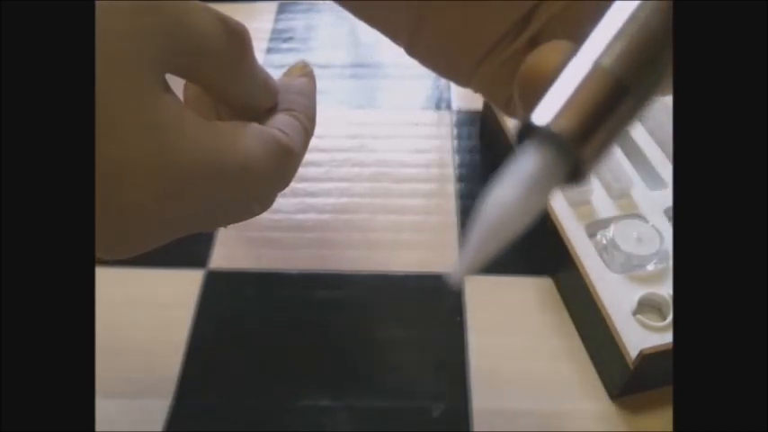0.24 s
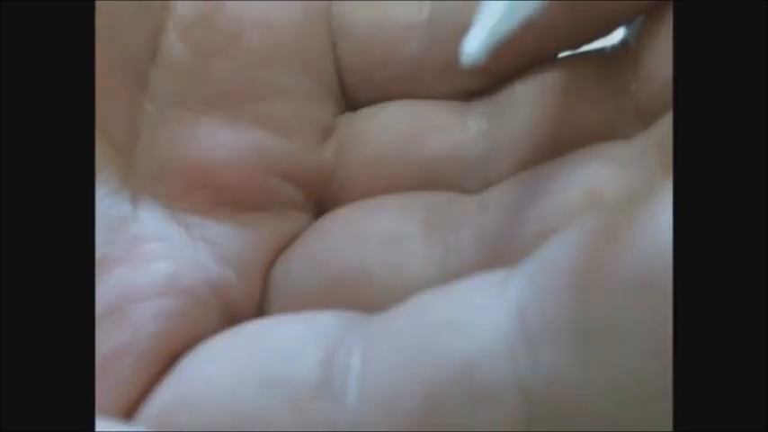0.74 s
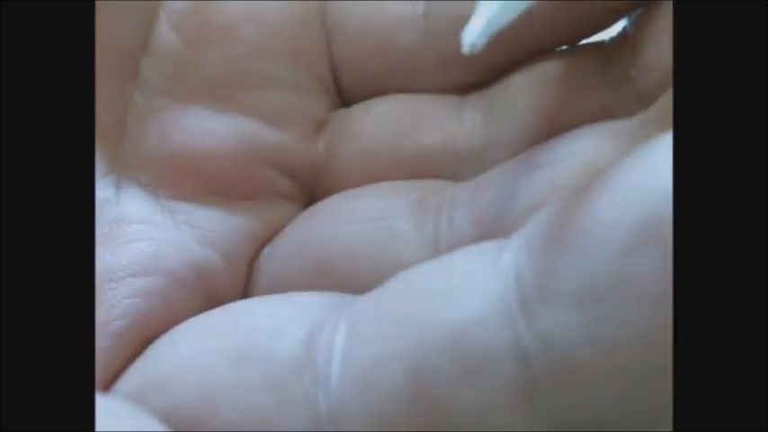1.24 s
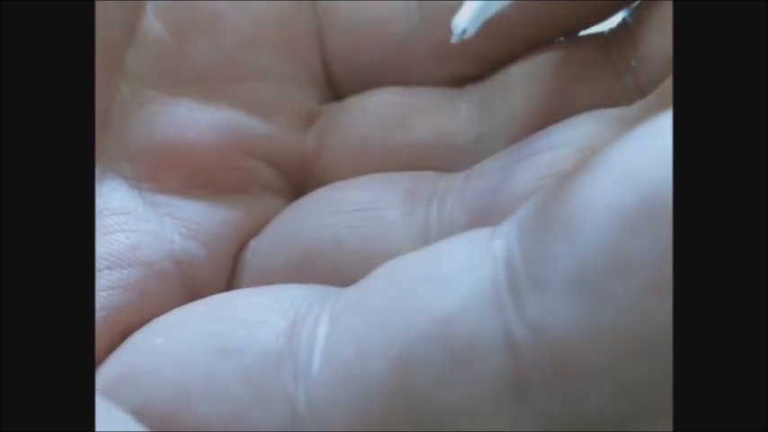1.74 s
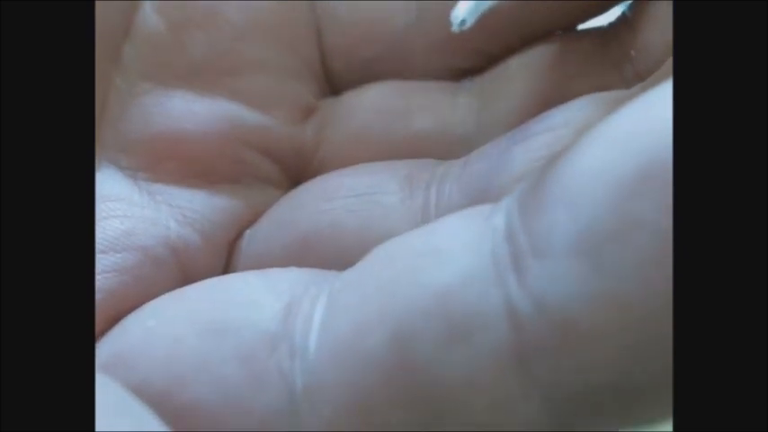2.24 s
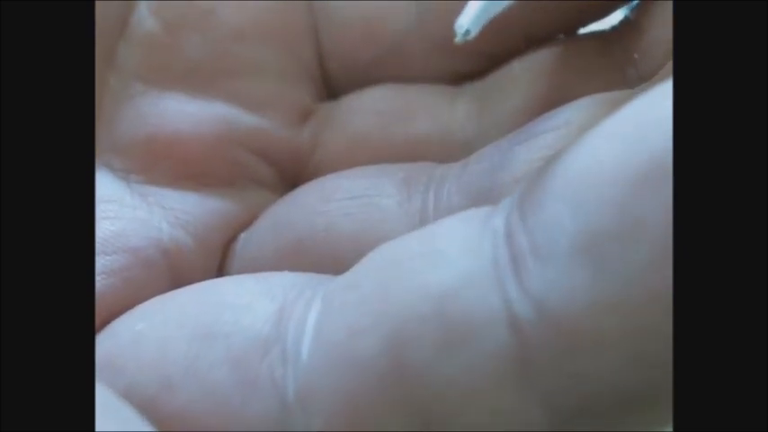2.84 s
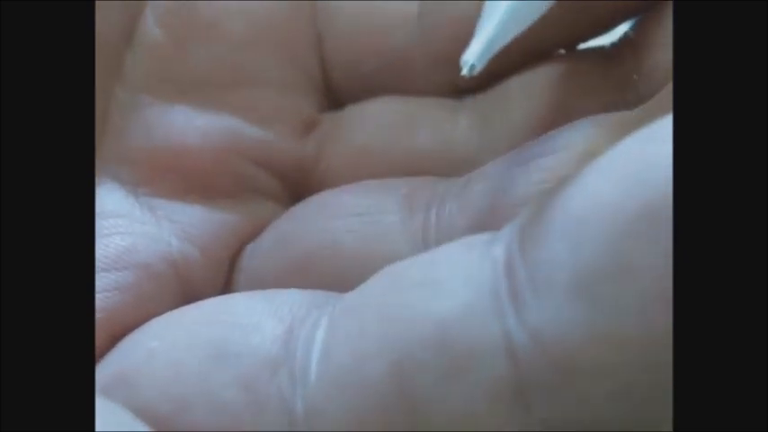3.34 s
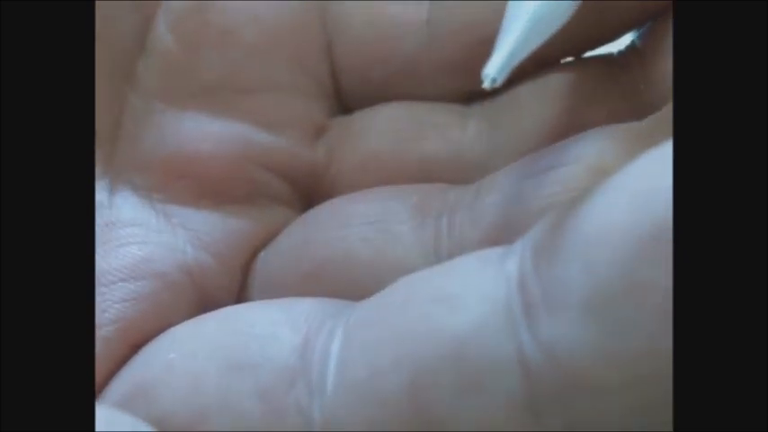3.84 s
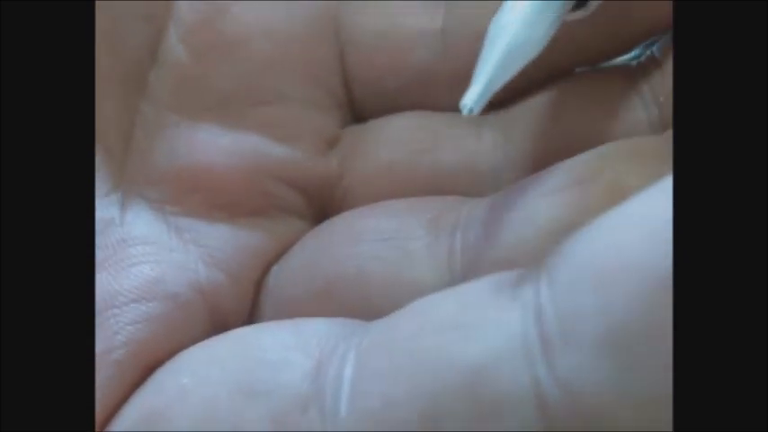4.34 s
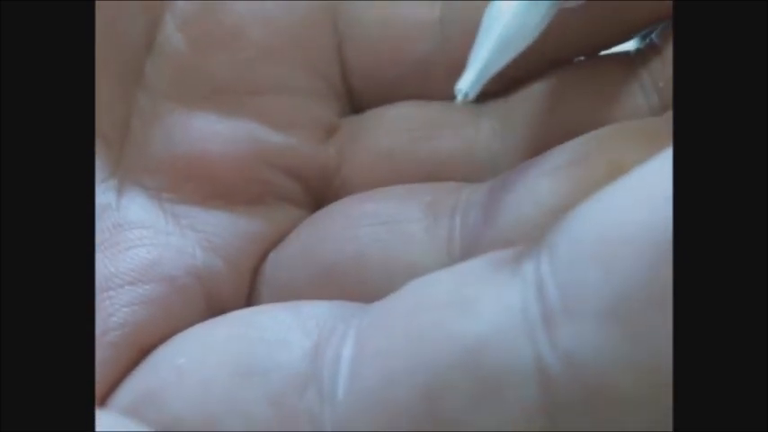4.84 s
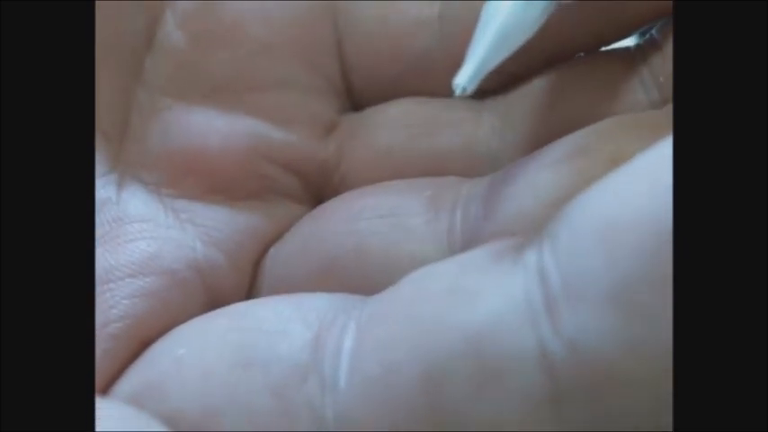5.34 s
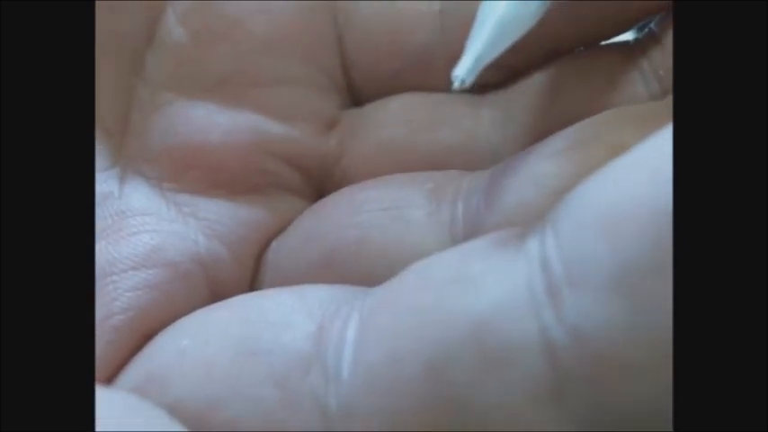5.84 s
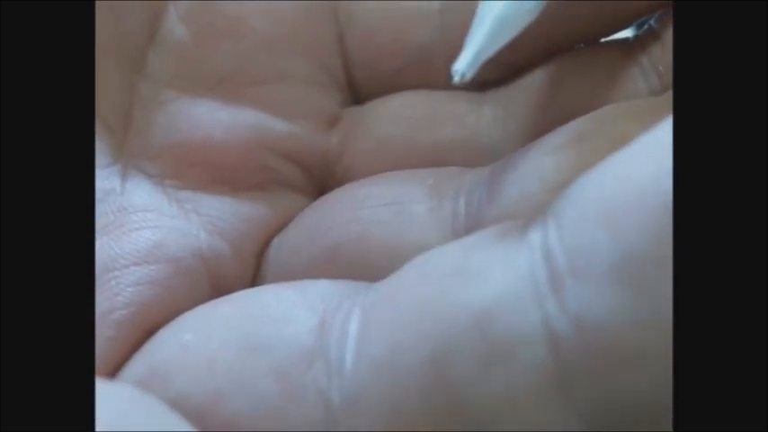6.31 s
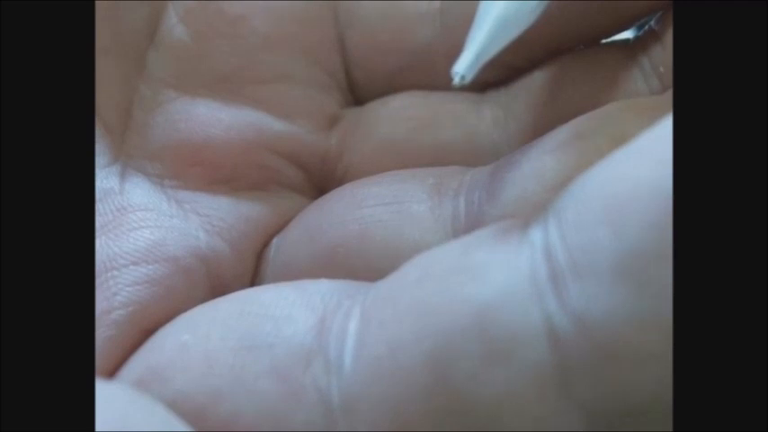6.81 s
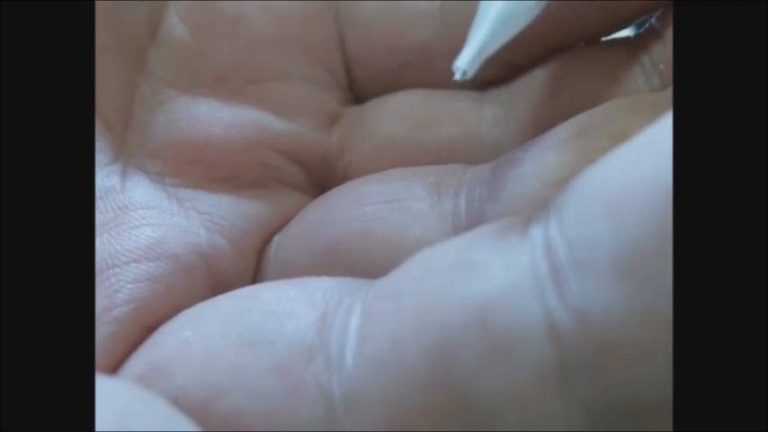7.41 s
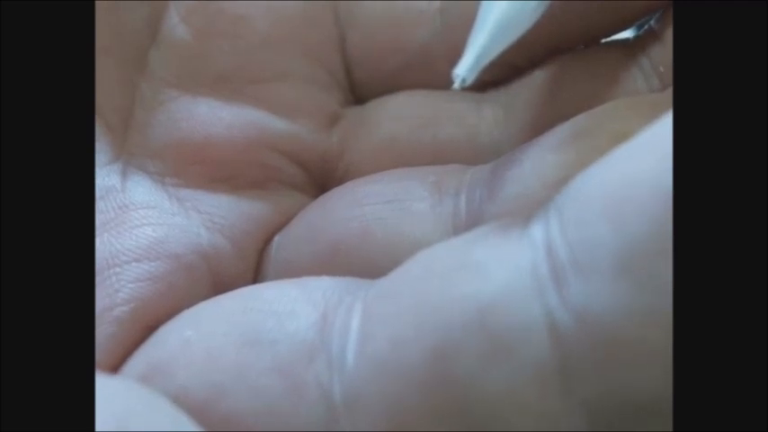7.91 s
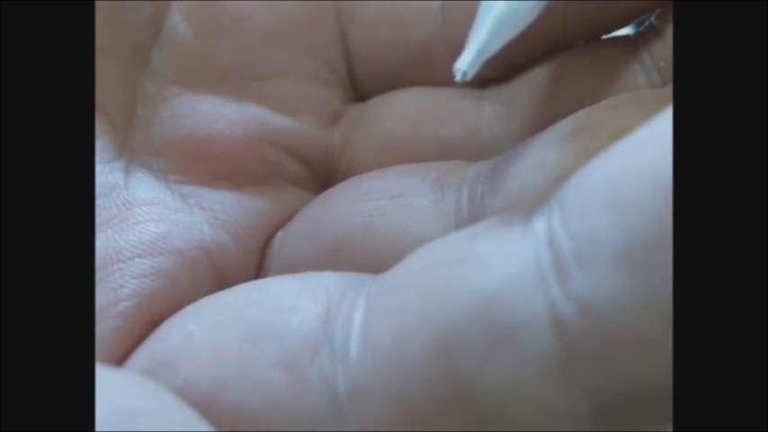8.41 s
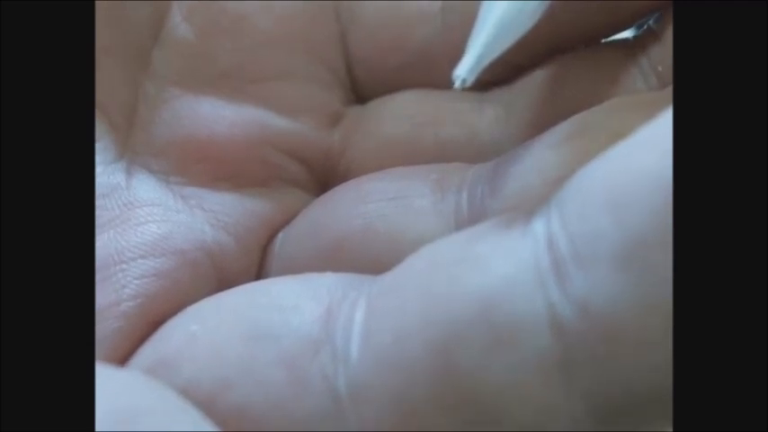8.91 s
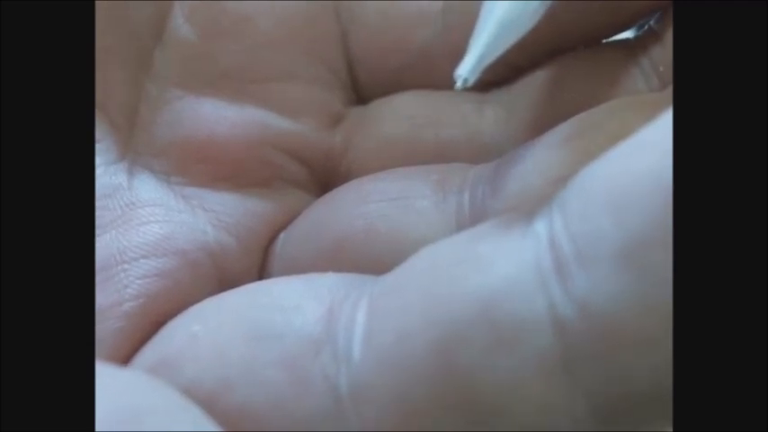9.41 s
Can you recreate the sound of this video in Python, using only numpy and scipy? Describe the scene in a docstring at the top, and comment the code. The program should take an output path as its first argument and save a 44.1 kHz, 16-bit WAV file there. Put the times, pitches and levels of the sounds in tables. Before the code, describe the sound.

A small rotary tattoo pen buzzes nearby in a quiet room, its motor humming and its needle rattling with a bright, ringing edge and little bass. It starts suddenly and runs in four stretches, the tone changing briefly in each of the first two. In the pauses, soft ticks and a faint, steady fan-like hum are heard, and a light switch click marks two of the restarts. The last stretch continues to the end.

```python
"""A quiet room with a steady fan-like tone; at 0.6 s the buzz of a nearby pen-style rotary tattoo machine
cuts in abruptly, already at full speed. Its motor hums, and once a turn a cam (an off-centre wheel)
knocks the needle bar, which rattles in its cartridge and rings the casing. Twice early on the fingers
loosen and the buzz changes colour. The machine pauses at about 1.5, 3.5 and 7.7 s, with switch clicks
at the first two restarts and two other short ticks in the pauses, then buzzes on to the end."""
import sys
import numpy as np
from scipy import signal
from scipy.fft import rfft, irfft, next_fast_len
from scipy.io import wavfile

SR = 44100
rng = np.random.default_rng(int(sys.argv[2]) if len(sys.argv) > 2 else 0)


def unload_wav(signal):
    """Save mono or channel-first audio to the path in sys.argv[1] as 16-bit WAV at rate SR, clipped to [-1, 1]."""
    wavfile.write(
        sys.argv[1],
        SR,
        np.round(np.clip(np.atleast_2d(signal).T, -1, 1) * 32767).astype(np.int16),
    )


N = 426006

# Each stretch of buzzing. Columns: on_s, off_s, spin_up_s (time constant), extra_speed_hz, grip (0-1),
# rattle_db, thin_ring_db, sizzle_db, scrape_db
MOTOR_RUNS = [(.58, 1.52, .0003, 1.36, 0.67, -39.5, -46, -50.8, -6),
              (1.915, 3.535, .028, 2.58, 0.84, -39, -39.5, -56.5, -3),
              (4.644, 7.688, .028, 2.45, 0.75, -38, -37.6, -56.5, -13),
              (7.968, 9.9, .033, 1.03, 0.32, -37.5, -38, -54.5, -10)]


def tattoo_machine():
    """The whole pen: motor speed sets the pitch and force, and the hold sets the colour."""
    working_hz, sag_s, relax_s = 159.9, .85, 2.92
    throttle = share_of_full_speed()
    age_s, extra_hz, first_grip, rattle_db, ring_db, sizzle_db, scrape_db = current_run()
    loose, sleeve_shift_hz, tip_shift_hz, scrape_change_db, ring_change_db = loose_holds()
    # During each run the motor slows a little and the fingers relax.
    speed_hz = working_hz + extra_hz * np.exp(-age_s / sag_s)
    grip = first_grip * np.exp(-age_s / relax_s) * (1 - loose)
    turns = np.cumsum(throttle * speed_hz * (1 + 0.000295 * drift(25))) / SR
    knock = throttle ** 1.8 * cam_knocks(turns)
    bar, needle = throttle ** 1.53 * rattle(turns)
    # So small a body gives off little bass.
    knock = band_limit(knock, 1903, "high", order=6)
    bar = from_db(rattle_db) * band_limit(bar, 1660, "high", order=4)
    knock = band_limit(knock, 10400, "low", order=3)  # the cam's contact is slightly soft
    knock = from_db(-12.5 + 1.5 * grip) * knock  # a firm grip makes it knock harder
    pen = pen_body(knock, bar, grip, sleeve_shift_hz, tip_shift_hz, scrape_db + scrape_change_db)
    treble = needle_treble(needle, ring_db + ring_change_db, sizzle_db)
    return spread_in_time(pen + treble) + throttle ** 5 * motor_hum(turns) + bar_whirr(throttle)


def cam_knocks(turns, jitter_s=.000011, spread_db=-0.35, bounce=0.23, bounce_s=0.000863):
    """One hit a turn and a weaker bounce, each a little uneven in timing and strength."""
    turn_ends = np.interp(np.arange(1, int(turns[-1])), turns, np.arange(N))
    late, strong = rng.standard_normal((2, len(turn_ends), 2))
    hit_at = (turn_ends[:, None] + (late * jitter_s + [0, bounce_s]) * SR).reshape(-1, 1)
    force = (from_db(spread_db * strong) * [1, bounce]).reshape(-1, 1)
    # A hit that falls between samples is shared among its neighbours.
    near = hit_at.astype(int) + np.arange(-5, 7)
    pulses = force * np.sinc(near - hit_at)
    return np.bincount(np.clip(near, 0, N - 1).ravel(), pulses.ravel(), N)


def rattle(turns, burst=0.9, burst_turns=0.1, lead_turns=0.14, rebound_turns=0.31,
           spread_db=1.0, grain_db=2.5):
    """Bar and needle (a row each) rub all the time and chatter at each knock and on the way back."""
    from_knock = (turns + .5) % 1 - .5
    stroke = (turns + .5).astype(int)
    strength = from_db(spread_db * rng.standard_normal((stroke[-1] + 1, 2)))[stroke].T
    chatter = burst * strength[0] * np.exp(np.minimum(from_knock / lead_turns, -from_knock / burst_turns))
    rebound = strength[1] * np.exp(-np.abs(from_knock + rebound_turns) / lead_turns)
    pressure = (1 + chatter + rebound) * from_db(grain_db * drift(3000))
    moving = np.gradient(turns) > 0
    return pressure / np.sqrt(np.mean(pressure[moving] ** 2)) * rng.standard_normal((2, N))


def pen_body(knock, rub, grip, sleeve_shift_hz, tip_shift_hz, scrape_db):
    """Knocks and rubbing ring the pen; the notes of its barrel, sleeve and tip follow the hold."""
    # The casing's unchanging notes. Columns: pitch_hz, width_hz, knock_db, rattle_db
    casing_notes = [(2560, 170, -2, -1.5), (3120, 200, -20, -14), (3600, 220, -9, -3), (4080, 380, -14, -2),
                    (4680, 220, -14, -5), (5170, 330, -6, -2), (5850, 400, -20, -14), (7550, 600, -20, -7),
                    (9000, 1100, -24, -5), (9800, 700, -28, -8), (10480, 500, -24, -2)]
    stiffen_hz = 250 * grip  # gripping stiffens the barrel and sleeve
    barrel_gain = from_db(5 - 12 * grip)  # it also damps the barrel
    tip_gain = 1 / (1 + 0.32 * from_db(scrape_db))  # a scraping needle damps the tip

    def push(knock_db, rattle_db):
        return from_db(knock_db) * knock + from_db(rattle_db) * rub

    direct = from_db(-10.5) * rub
    scrape = resonate(from_db(scrape_db) * rub, hz=8770, width_hz=280)
    barrel = barrel_gain * moving_resonance(push(6, -48), 1932 + stiffen_hz, width_hz=80)
    sleeve = moving_resonance(push(2.66, -16), 2168 + stiffen_hz + sleeve_shift_hz, width_hz=258)
    tip = tip_gain * moving_resonance(push(0, 1.3), 6880 + tip_shift_hz, width_hz=540)
    casing = sum(resonate(push(knock_db, rattle_db), hz, width_hz)
                 for hz, width_hz, knock_db, rattle_db in casing_notes)
    return band_limit(direct + scrape + barrel + sleeve + tip + casing, 11240, "low", order=6)


def needle_treble(needle, ring_db, sizzle_db):
    """The thin needle makes the highest sounds: a fine ring and a sizzle."""
    ring = band_limit(resonate(needle, hz=11800, width_hz=640), 16000, "low", order=4)
    sizzle = band_limit(needle, 8400, "high", order=3)
    return from_db(ring_db) * ring + from_db(sizzle_db) * sizzle


def spread_in_time(x, delay_at_1khz_s=0.000555):
    """High bending waves travel along the pen faster than low ones, so each hit arrives smeared."""
    size = next_fast_len(N + SR)
    hz = np.fft.rfftfreq(size, 1 / SR)
    phase_lag = 4 * np.pi * delay_at_1khz_s * np.sqrt(1000 * hz)
    return irfft(rfft(x, size) * np.exp(-1j * phase_lag), size)[:N]


def motor_hum(turns):
    """The rotor's unbalance and its electrical contacts hum at multiples of the turning rate."""
    # The pure tones of the hum. Columns: multiple, level_db
    hum_tones = [(1, -65), (2, -67.5), (3, -79), (4, -67.5), (5, -81), (6, -74.5), (7, -73), (8, -59.5),
                 (9, -66.5), (10, -61), (19, -61.5), (22, -53), (23, -58), (25, -61.5), (26, -62.5)]
    return sum(np.sqrt(2) * from_db(db) * np.sin(2 * np.pi * (multiple * turns + rng.random()))
               for multiple, db in hum_tones)


def bar_whirr(throttle):
    """The slack bar whirrs only while the motor speeds up or slows down, higher as it turns faster."""
    rub = band_limit(rng.standard_normal(N), 1950, "high", order=2)
    whirr = rms_one(moving_resonance(rub, hz=1520 + 447 * throttle, width_hz=260))
    return from_db(-42) * throttle * (1 - throttle) * whirr


def share_of_full_speed(coast_s=.085):
    """From 0 to 1: the first run cuts in at once, later ones speed up; friction brakes each evenly."""
    t, share = np.arange(N) / SR, np.zeros(N)
    for on_s, off_s, spin_up_s, *_ in MOTOR_RUNS:
        run_up = 1 - np.exp(-np.maximum(t - on_s, 0) / spin_up_s)
        share += run_up * np.clip(1 - (t - off_s) / coast_s, 0, 1)
    return share


def current_run():
    """At every sample: seconds into the run, then that run's columns from extra_speed_hz onward."""
    t, runs = np.arange(N) / SR, np.array(MOTOR_RUNS)
    row = np.maximum(np.searchsorted(runs[:, 0], t, "right") - 1, 0)
    on_s, _, _, *settings = runs[row].T
    return np.maximum(t - on_s, 0), *settings


def loose_holds(regrip_s=.16):
    """How loosely the pen hangs (0-1), then the four changes this brings, faded in and out."""
    # Moments when the fingers loosen.
    # Columns: start_s, end_s, sleeve_shift_hz, tip_shift_hz, scrape_change_db, thin_ring_change_db
    holds = [(.4, 1.29, 390, -340, -6, -7), (2.79, 3.31, 80, -150, 5.5, 0.5)]
    t, curves = np.arange(N) / SR, 0
    for start_s, end_s, *changes in holds:
        loose = np.clip(.5 + np.minimum(t - start_s, end_s - t) / regrip_s, 0, 1)
        curves = curves + np.outer([1, *changes], loose)
    return curves


def small_clicks(crack_db=0.5, crack_s=0.0035):
    """Each click is a brief crack that rings a quickly fading note."""
    # Switch clicks at two restarts, and two other short ticks in the pauses (one has two notes).
    # Columns: start_s, gain_db, pitch_hz, width_hz
    clicks = [(1.919, -49, 2980, 160), (4.142, -50, 1070, 160), (4.142, -61, 4400, 1300),
              (4.639, -51, 2700, 200), (7.835, -50, 2700, 110)]
    out, age_s = np.zeros(N), np.arange(SR // 10) / SR
    for start_s, db, hz, width_hz in clicks:
        crack = rng.standard_normal(len(age_s)) * np.exp(-age_s / crack_s)
        ring = rms_one(resonate(crack, hz, width_hz)) * np.std(crack)
        at = int(start_s * SR)
        out[at:at + len(age_s)] += from_db(db) * (ring + from_db(crack_db) * crack)
    return cut(out, 8100, "low")


def room():
    """Dull air noise and fan-like tones, both softer before the first run, and a faint high hiss."""
    # The colour of the air noise. Columns: frequency_hz, relative_level_db
    air_colour = [(25, 0), (50, -5), (66, -7.5), (90, -13.5), (150, -5), (280, -12), (460, -12.5),
                  (950, -16), (1900, -20.5), (3700, -29.5), (5000, -29.5), (6400, -33.5), (9300, -32),
                  (12000, -45)]
    # Fan-like tones that waver slightly. Columns: pitch_hz, level_db
    fan_tones = [(87, -69.5), (190, -74.5), (452, -74.5), (571, -82), (736, -66), (1470, -80),
                 (1766, -79.5)]
    air_hz, air_db = np.transpose(air_colour)
    shape = from_db(np.interp(np.log(np.fft.rfftfreq(N, 1 / SR) + 1), np.log(air_hz), air_db))
    dull_noise = irfft(rfft(rng.standard_normal(N)) * shape, N)
    air = from_db(-57.5) * rms_one(cut(dull_noise, 16, "high"))
    tones = sum(np.sqrt(2) * from_db(db) * np.sin(2 * np.pi * np.cumsum(hz + 1.7 * drift(12)) / SR)
                for hz, db in fan_tones)
    hiss = from_db(-80.5) * rms_one(resonate(rng.standard_normal(N), hz=7860, width_hz=350))
    early = np.arange(N) / SR < MOTOR_RUNS[0][0]
    return air * from_db(-1.5 * early) + tones * from_db(-5.5 * early) + hiss


def from_db(db):
    """Turn decibels into a gain."""
    return 10 ** (np.asarray(db) / 20)


def rms_one(x):
    """Scale a signal so that its average level (rms) is 1."""
    return x / np.sqrt(np.mean(x ** 2) + 1e-20)


def drift(rate_hz):
    """A random wander of level 1 that picks a new value rate_hz times a second."""
    points = rng.standard_normal(int(N / SR * rate_hz) + 2)
    return rms_one(np.interp(np.arange(N) / SR * rate_hz, np.arange(len(points)), points))


def cut(x, hz, kind):
    """A gentle filter that keeps the "low" or the "high" side of hz."""
    return signal.sosfilt(signal.butter(2, hz, kind, fs=SR, output="sos"), x)


def band_limit(x, hz, kind, order):
    """A steep filter that keeps the "low" or the "high" side of hz without delaying it."""
    return signal.sosfiltfilt(signal.butter(order, hz, kind, fs=SR, output="sos"), x)


def resonate(x, hz, width_hz):
    """Ring at one pitch; a smaller width rings longer."""
    decay = np.exp(-np.pi * width_hz / SR)
    feedback = [1, -2 * decay * np.cos(2 * np.pi * hz / SR), decay ** 2]
    return signal.lfilter(np.array([1, 0, -1]) * (1 - decay ** 2) / 2, feedback, x + 1e-18)


def moving_resonance(x, hz, width_hz):
    """Ring at a pitch that follows the curve hz."""
    decay = np.exp(-np.pi * width_hz / SR)
    rotation = np.exp(2j * np.pi * np.cumsum(hz) / SR)
    return 2 * np.real(rotation * signal.lfilter([1 - decay], [1, -decay], x / rotation + 1e-18))


def scene():
    """The machine, the clicks and the room in one channel."""
    return (tattoo_machine() + small_clicks() + room())[None]


def record(dry, cutoff_hz=15720, offset=.0038):
    """The highest treble is cut steeply; the converter adds a small steady offset."""
    low_pass = signal.firwin(401, cutoff_hz, fs=SR)[None]
    return signal.fftconvolve(dry, low_pass, "same", axes=1) + offset


dry = scene()
out = record(dry)
unload_wav(out)
```